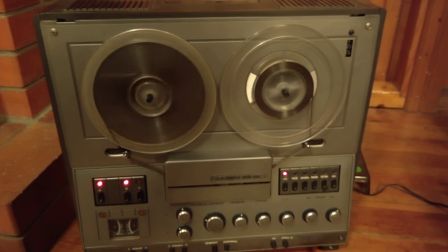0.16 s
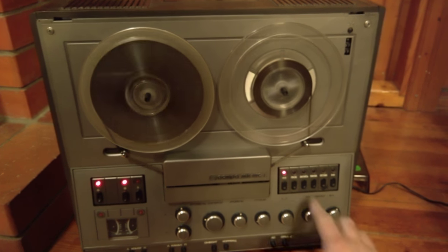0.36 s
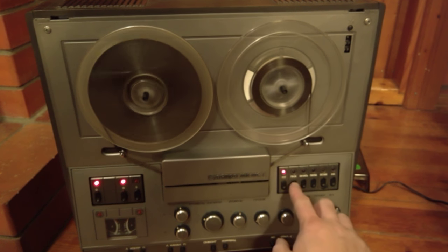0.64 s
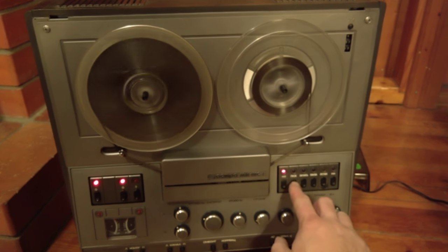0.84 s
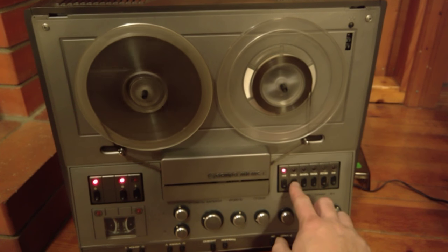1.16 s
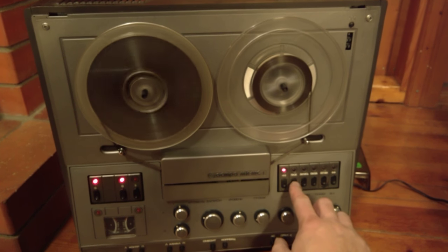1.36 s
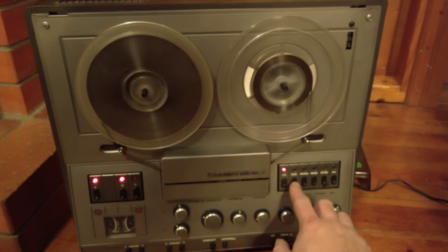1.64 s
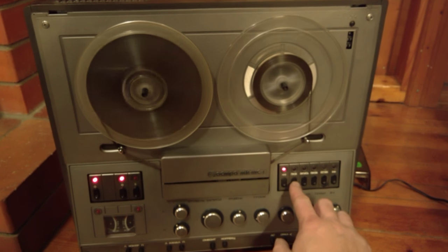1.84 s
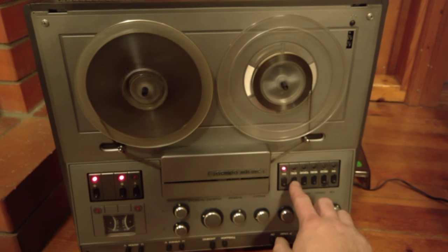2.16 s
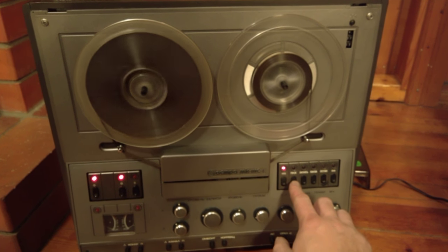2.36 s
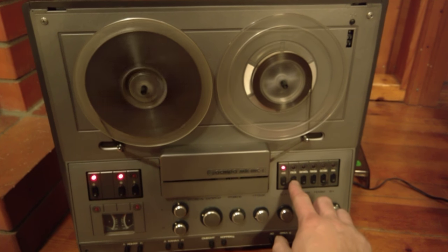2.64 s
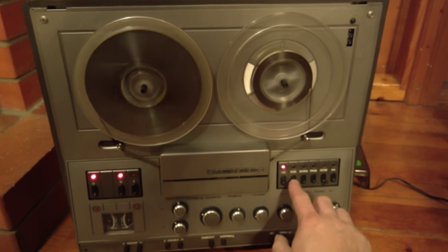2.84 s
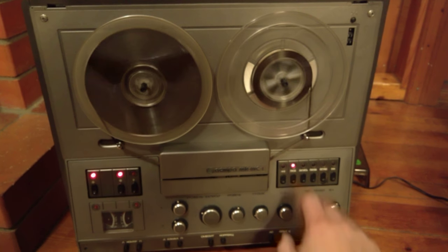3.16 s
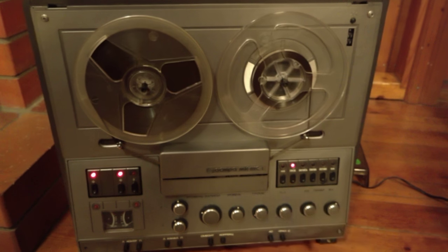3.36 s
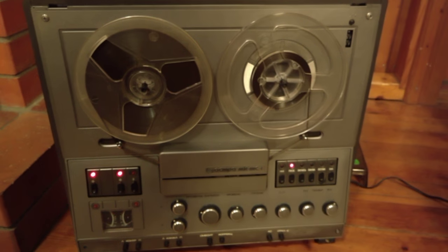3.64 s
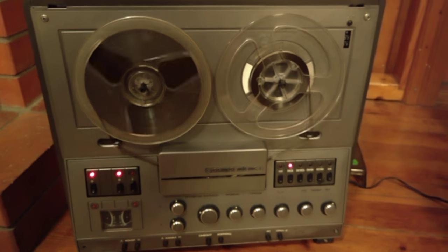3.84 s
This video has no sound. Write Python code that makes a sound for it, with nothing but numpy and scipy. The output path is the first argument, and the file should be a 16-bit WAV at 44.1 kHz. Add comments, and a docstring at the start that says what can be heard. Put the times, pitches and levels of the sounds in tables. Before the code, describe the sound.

An old reel-to-reel tape recorder winds fast with rapid knocking rattle, ticks and gritty scrapes; a key clicks, the winding dies away, then a hard clunk buzzes in the case. Small room, close camera microphones.

```python
"""An old reel tape recorder winds fast on a wooden floor: the quick spindle knocks once a turn and rattles the case,
the slow reel ticks on its hub, tape whispers, and now and then its edge scrapes in short gritty hisses.
After a soft thump the stop key strikes steel and the winding dies away; with a faint gritty tick, cloth slides
past as wide soft noise. Then a latch clicks and a solenoid slams, ringing a plate, and buzzes in the case on
unsteady tones. Quiet air and the fading echoes of a small room surround it all, heard by close camera microphones."""
import sys
import numpy as np
from scipy import signal
from scipy.fft import rfft, irfft, next_fast_len
from scipy.io import wavfile
from scipy.ndimage import uniform_filter1d, map_coordinates

SR = 44100
rng = np.random.default_rng(int(sys.argv[2]) if len(sys.argv) > 2 else 0)


def master_out(mix):
    """Clip the mix to full scale and print it as 16-bit PCM to the path in sys.argv[1]."""
    frames = np.transpose(np.atleast_2d(mix))
    ceiling = np.clip(frames, -1, 1)
    pcm = np.round(ceiling * 32767).astype(np.int16)
    wavfile.write(sys.argv[1], SR, pcm)


def decibels_to_gain(level_db):
    """Convert a level in decibels to a linear amplitude gain (20 dB per decade)."""
    exponent = np.asarray(level_db, float) / 20
    return 10 ** exponent


N = 176400
T = np.arange(N) / SR
STOP_S = 3.12  # the winding begins to die away


def unit(x):
    """Scale to an rms (average strength) of 1."""
    return x / np.sqrt(np.mean(x ** 2) + 1e-20)


def along(points, hz):
    """Read a curve of (f/Hz, value) points, spaced by pitch."""
    f, value = np.transpose(points)
    return np.interp(np.log(hz + 1), np.log(f + 1), value)


def wobble(rate):
    """A smooth random curve with rate fresh values a second."""
    knots = rng.standard_normal(int(N * rate / SR) + 4)
    return map_coordinates(knots, [T * rate])


def filtered(x, response):
    """Change each frequency's strength and timing by a complex response."""
    m = next_fast_len(x.shape[-1] + 8192)
    f = np.fft.rfftfreq(m, 1 / SR)
    return irfft(rfft(x, m) * response(f), m)[..., :x.shape[-1]]


def coloured(shape, spectrum, tilt_db=0):
    """Noise of rms 1 with a spectrum, leaned by tilt_db per octave around 2 kHz."""
    def response(f):
        return decibels_to_gain(along(spectrum, f) + tilt_db * np.log2((f + 20) / 2000))
    return unit(filtered(rng.standard_normal(shape), response))


def broad(spectrum):
    """Hiss from a wide surface: part shared, part each microphone's own."""
    wide = 0.88  # radians from a shared hiss toward separate ones
    x = coloured((3, N), spectrum)
    return unit(x[0] + np.tan(wide) * x[1:])


def ring(x, hz, width_hz):
    """One resonance; a second, broader one steepens its skirts."""
    def response(f):
        narrow = 1j * f * width_hz / (hz * hz - f * f + 1j * f * width_hz)
        return narrow / (1 + 1j * (f / hz - hz / (f + 1)))
    return filtered(x, response)


def body(force, modes, sharp, waver_db, blow=0):
    """Rough force and clean blows ring a solid's modes (pitch over width = sharp); their strengths drift."""
    out = np.zeros(N)
    for hz, db in modes:
        tone = unit(ring(force * rng.standard_normal(N) + blow, hz, hz / sharp))
        out += decibels_to_gain(db + waver_db * wobble(7.1)) * tone
    return out


def add(track, s, x):
    """Mix x in at time s."""
    part = track[round(s * SR):][:len(x)]
    part += x[:len(part)]


def swell(t, rise_s, fall_s):
    """Rise, then die away exponentially."""
    return (1 - np.exp(-t / rise_s)) * np.exp(-t / fall_s)


def running():
    """Full until the stop, then dying by 60 dB every half second."""
    return decibels_to_gain(-60 * np.maximum(T - STOP_S, 0) / 0.5)


# how far the quick spindle has turned: t/s, turns made
SPINDLE_TURNS = [(0, .42), (.31, 10.24), (.62, 20.35), (.93, 30.73), (1.24, 41.33), (1.55, 52.23),
                 (2.17, 74.05), (2.48, 85.15), (3.1, 107.09)]
# running strength of the rattle before it dies away: t/s, level/dB
WINDING_LEVEL = [(0, -47), (.4, -46.5), (1.2, -43.5), (2, -43.5), (3.1, -43)]
# notes of the case and their balance: f/Hz, level/dB
CASE_MODES = [(300, -14.5), (545, -9), (746, -12), (890, -14), (992, 0.5), (1075, -1), (1172, -3.5),
              (1320, -7.5), (1420, -7.5)]
# moments when the rattle sings on one note: middle t/s, length t/s, f/Hz, level/dB before its beat and waver
SINGING = [(1.274, 0.12, 1159, -47.5), (1.627, 0.26, 1172, -40), (1.803, 0.23, 760, -47.5),
           (1.966, 0.023, 1110, -33), (2.295, 0.35, 995, -41), (2.454, 0.061, 999, -36)]


def spindle():
    """A blow and loose contacts each turn, over steady chatter, shake the case; at times one mode sings."""
    knock_lead = .05  # turns
    chatter_db = -13.5  # steady contact against the knocks
    knock_db, knock_s = 35, .0006  # a blow's total push, spread over a short soft contact
    turns = np.interp(T, *np.transpose(SPINDLE_TURNS)) + knock_lead
    size = decibels_to_gain(1.5 * rng.standard_normal(200))[turns.astype(int)]  # each turn's knock differs
    contacts = size * np.exp(-(turns % 1) / 0.3) * (T < STOP_S)
    clicks = size * np.diff(np.floor(turns), prepend=0)
    blow = decibels_to_gain(knock_db) * uniform_filter1d(clicks, size=round(knock_s * SR))
    x = body(contacts + decibels_to_gain(chatter_db), CASE_MODES, sharp=24, waver_db=2.5, blow=blow)
    # even out the half-second level, then set it from the table
    x = x / np.sqrt(uniform_filter1d(x ** 2, SR // 2))
    x = x * decibels_to_gain(np.interp(T, *np.transpose(WINDING_LEVEL))) * running()
    beat = 1 + 0.37 * np.cos(2 * np.pi * (turns - .2))  # once a turn
    for s, length_s, hz, db in SINGING:
        cycles = np.cumsum(hz + 12 * wobble(30)) / SR
        window = np.exp(-((T - s) / length_s * 2) ** 4)
        x = x + decibels_to_gain(db + 1.17 * wobble(25.11)) * beat * window * np.sin(2 * np.pi * cycles)
    return x


# how far the slow reel has turned: t/s, turns made
REEL_TURNS = [(0, -5.6), (.835, 0), (1.421, 4), (3.006, 15), (3.11, 15.72)]
# pushes on the hub in each turn, before their random size: place in the turn, level/dB
REEL_TICKS = [(0, -43.5), (.4, -46.5), (.74, -52)]
# notes of the hub and their balance: f/Hz, level/dB
HUB_MODES = [(2080, 1), (2357, 6), (2660, -2.5), (3045, -15)]


def reel():
    """Three ticks a turn and a faint steady hiss ring the hub."""
    turns = np.interp(T, *np.transpose(REEL_TURNS))
    size = decibels_to_gain(1.1 * rng.standard_normal((40, 3)))
    ticks = np.zeros(N)
    for k, (place, db) in enumerate(REEL_TICKS):
        since = turns - place
        ticks += decibels_to_gain(db) * size[np.floor(since).astype(int) + 10, k] * np.exp(-(since % 1) / 0.065)
    force = ticks * (T < STOP_S) + decibels_to_gain(-60.5) * running()
    hub = body(force, HUB_MODES, sharp=21.7, waver_db=2.5)
    return unit(hub) * np.sqrt(np.mean(force ** 2))  # as strong as its force


# colour of the tape's whisper: f/Hz, level/dB per Hz
TAPE_COLOUR = [(150, -15.5), (900, 3), (3300, -13.5), (15800, -19)]


def tape():
    """Tape passing the guides makes a wide whisper of noise with a fluttering level."""
    level_db = -47 + 1.84 * wobble(18) + 1.6 * wobble(150)
    return broad(TAPE_COLOUR) * decibels_to_gain(level_db) * running()


# colour of quiet air, also used for dull puffs and rough rattle: f/Hz, level/dB per Hz
AIR_COLOUR = [(15, -56), (42, -14), (110, -9.5), (335, -1.5), (637, -3.5), (15800, -38.5)]


def air():
    """Steady low noise, part shared and part each microphone's own."""
    x = coloured((3, N), AIR_COLOUR)
    return decibels_to_gain(-59) * (0.8 * x[0] + .5 * x[1:])


# how long echoes take to fall 60 dB: f/Hz, t60/s
ROOM_DECAY = [(200, 0.31), (2000, 0.36), (12000, 0.11)]


def room(x):
    """Many mixed echoes act as fading noise: a fresh diffuse tail for every quarter second."""
    out, step = np.zeros((2, N + SR)), SR // 4
    for i in range(0, N, step):
        hz, t, z = signal.stft(rng.standard_normal((2, SR // 2)), SR, nperseg=256)
        fade = decibels_to_gain(-60 * t / along(ROOM_DECAY, hz)[:, None])
        tail = signal.istft(z * fade, SR, nperseg=256)[1]
        wet = signal.fftconvolve(x[None, i:i + step], tail / np.linalg.norm(tail[0]), axes=1)
        start = i + 200  # samples of delay before the echoes
        out[:, start:start + wet.shape[1]] += wet
    return decibels_to_gain(-10) * out[:, :N]


# how far the left side leads: f/Hz, lead/radians
LEFT_LEAD = [(2700, 0.3), (4200, 1.7)]
# how much stronger the left side is than the right: f/Hz, level/dB
LEFT_TILT = [(60, -1), (400, -3.5), (2400, 0), (9000, -6)]


def microphones(x):
    """Sound reaches the two microphones at slightly different times and strengths."""
    side = np.array([[.5], [-.5]])  # half the difference each way

    def response(f):
        return decibels_to_gain(side * along(LEFT_TILT, f)) * np.exp(1j * side * along(LEFT_LEAD, f))
    return filtered(x, response)


# brushes of the tape edge on the flange, and last a faint gritty tick as the cloth starts to slide:
# t/s, level/dB before the offsets below
SCRAPE_TIMES = [(0.0792, -34.5), (0.2418, -38.5), (0.398, -38.5), (0.4868, -34.5), (0.6539, -35),
                (0.815, -32.5), (0.8574, -34.5), (0.9133, -31.5), (0.9567, -33.5), (1.007, -40),
                (1.1084, -35.5), (1.155, -44), (1.279, -36), (1.7335, -35), (1.8851, -34.5), (2.018, -42.5),
                (2.1226, -38), (2.167, -44.5), (2.271, -42), (2.3281, -38), (2.4204, -36), (2.455, -46),
                (2.5067, -32.5), (2.595, -39.5), (2.9078, -30), (3.49, -51.5)]
# colour of their hiss: f/Hz, level/dB per Hz
FLANGE_COLOUR = [(1500, -12), (2500, -8), (7500, -3.5), (9900, 0), (12000, -10.5), (15800, -10)]


def scrapes():
    """Each tape-edge brush, and the last faint tick, is a gritty hiss with a short low tone like the case's."""
    out, t = np.zeros(N), T[:SR // 10]
    for s, db in SCRAPE_TIMES:
        grit = decibels_to_gain(4.14 * rng.standard_normal(len(t) // 40 + 1)).repeat(40)[:len(t)]
        hiss = coloured(len(t), FLANGE_COLOUR, 1.45 * rng.standard_normal())
        add(out, s - .003, decibels_to_gain(db + 8.5) * swell(t, 0.018, 0.0085) * grit * hiss)
        tone = np.sin(2 * np.pi * (545 + 20 * rng.standard_normal()) * t)
        add(out, s, decibels_to_gain(db - 2) * swell(t, 0.0028, 0.012) * tone)
    return out


# soft thumps: t/s, level/dB
THUMP_TIMES = [(2.591, -36), (3.223, -42.5), (3.486, -41), (3.856, -22.5)]


def thumps():
    """A soft push rings one low mode over a dull puff of noise."""
    out, t = np.zeros(N), T[:SR // 3]
    thump_hz, t60_s = 285, 0.076
    for s, db in THUMP_TIMES:
        sound = np.sin(2 * np.pi * thump_hz * t) + 0.64 * coloured(len(t), AIR_COLOUR)
        add(out, s, decibels_to_gain(db - 60 * t / t60_s) * (1 - np.exp(-t / 0.0029)) * sound)
    return out


# strikes of the keys, latch and solenoid: t/s, level/dB, tilt/dB per octave
BLOW_TIMES = [(3.094, -35, -4.5), (3.112, -25, -1.5), (3.8169, -35, -2.5), (3.83, -33, 0),
              (3.857, -35.5, 0), (3.8748, -9.5, 0.5), (3.882, -17, -2.5)]
# notes of the steel plate: f/Hz, level/dB before the tilt, t60/s
PLATE_MODES = [(527, -14, 0.13), (1360, -5.5, 0.074), (2410, -6.5, 0.043), (2760, -6.5, .06)]
# colour of the burst before the tilt: f/Hz, level/dB per Hz
CRACK_COLOUR = [(30, -52), (120, -14.5), (1400, 0.5), (3000, -6), (6300, -5.5), (15800, -22)]


def blows():
    """Steel on steel rings the plate's rough modes and gives a short burst of noise."""
    out, t = np.zeros(N), T[:SR // 3]
    for s, db, tilt_db in BLOW_TIMES:
        tones = np.zeros(len(t))
        for hz, mode_db, t60_s in PLATE_MODES:
            rough = unit(ring(rng.standard_normal(len(t)), hz, hz / 14))
            tones += decibels_to_gain(mode_db + tilt_db * np.log2(hz / 2000) - 60 * t / t60_s) * rough
        burst = coloured(len(t), CRACK_COLOUR, tilt_db) * swell(t, 0.00081, 0.0087)
        add(out, s, decibels_to_gain(db) * (tones * (1 - np.exp(-t / 0.0037)) + burst))
    return out


# the slide of cloth: start t/s, loudest t/s, spread t/s, level/dB
CLOTH_SLIDE = (3.485, 3.64, .075, -52.5)
# colour of the cloth: f/Hz, level/dB per Hz
WEAVE_COLOUR = [(500, -12.5), (2500, -13.5), (6300, -8), (15800, -19.5)]


def cloth():
    """Sliding fabric makes a soft, wide hiss that swells and fades."""
    start_s, top_s, spread_s, db = CLOTH_SLIDE
    shape = np.exp(-.5 * ((T - top_s) / spread_s) ** 2) * (T > start_s)
    return broad(WEAVE_COLOUR) * decibels_to_gain(db) * shape


# notes of the buzzing case and their balance: f/Hz, level/dB
BUZZ_MODES = [(281, -3), (540, -10.5), (1060, -4.5), (1430, -9)]


def buzz():
    """The engaged solenoid keeps the case humming on unsteady modes over a rough rattle."""
    start_s, t60_s, level_db = 3.9, 0.76, -26.5
    sound = 0.56 * coloured(N, AIR_COLOUR)
    for hz, db in BUZZ_MODES:
        cycles = np.cumsum(hz * (1 + 0.033 * wobble(90))) / SR
        sound += decibels_to_gain(db + 3.7 * wobble(40)) * np.sin(2 * np.pi * cycles)
    fade = decibels_to_gain(level_db - 60 * np.clip(T - start_s, 0, 1) / t60_s)
    return fade * sound * np.clip((T - start_s) / .015, 0, 1)


def scene():
    """The machine and cloth reach both microphones; room echoes and air surround them."""
    near = spindle() + reel() + scrapes() + thumps() + blows() + buzz()
    hiss = tape() + cloth()
    return microphones(near + hiss) + room(near + hiss[0]) + air()


def top_cut(x):
    """Nothing passes above the cut-off."""
    return signal.sosfilt(signal.butter(12, 15870, fs=SR, output="sos"), x)


def record(dry):
    """Pass the finished mix through the camera."""
    return top_cut(dry)


dry = scene()
out = record(dry)
master_out(out)
```